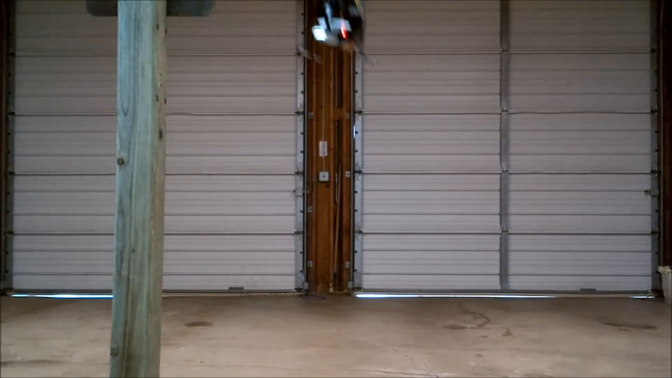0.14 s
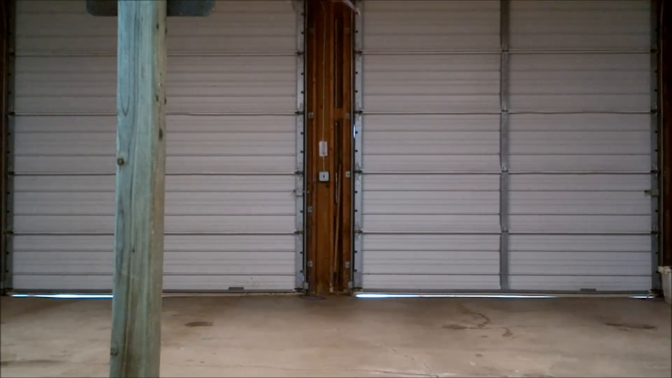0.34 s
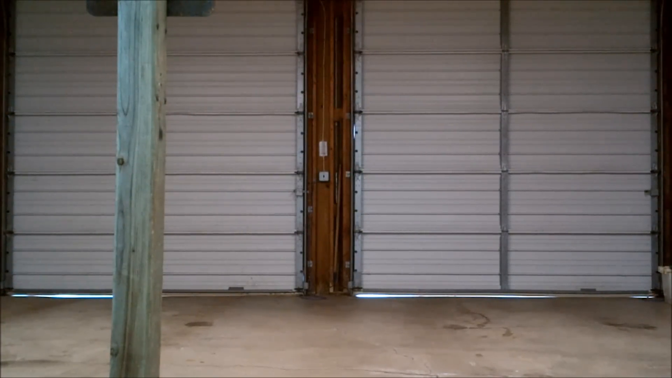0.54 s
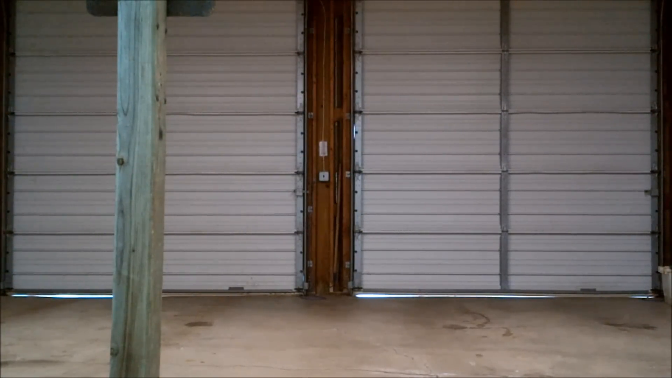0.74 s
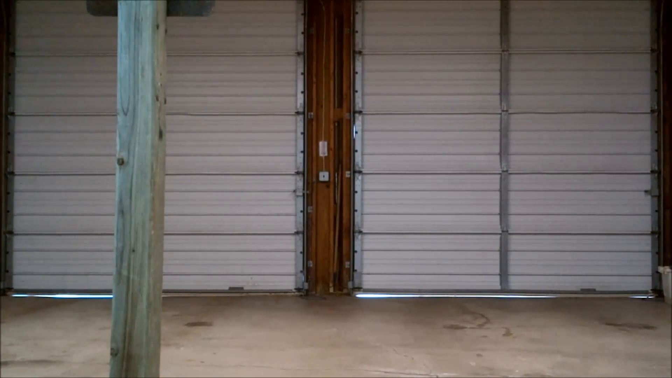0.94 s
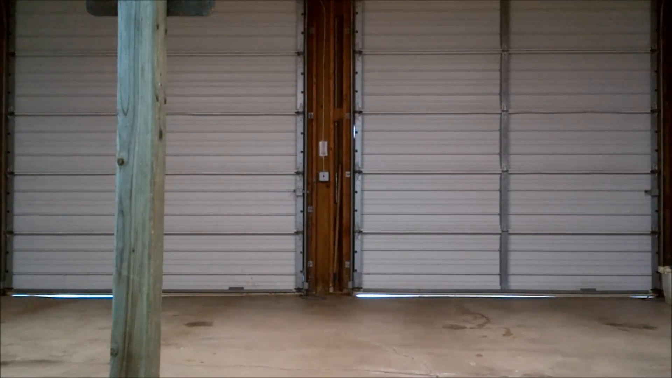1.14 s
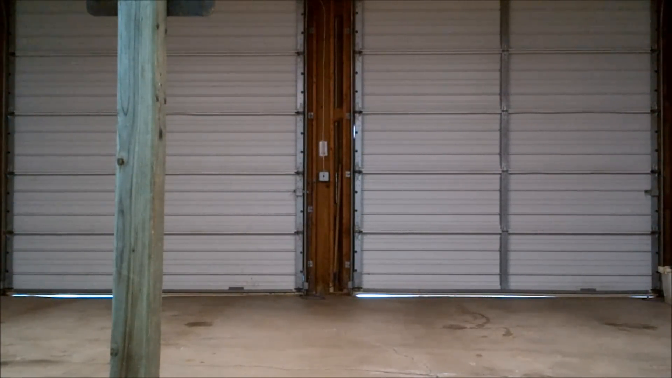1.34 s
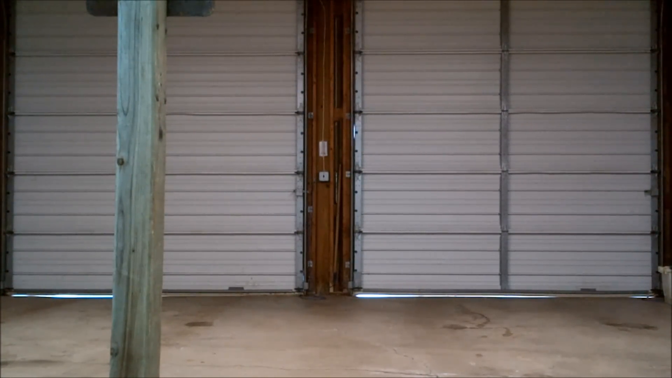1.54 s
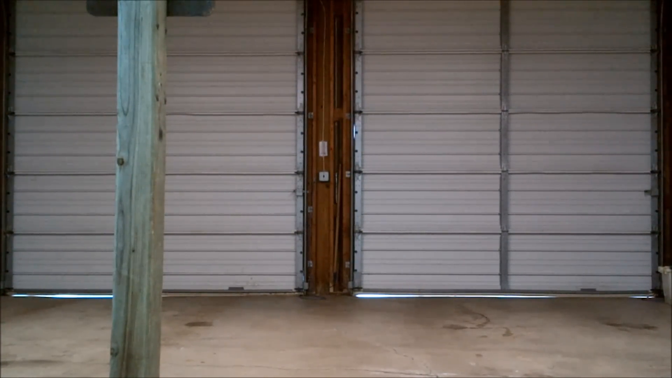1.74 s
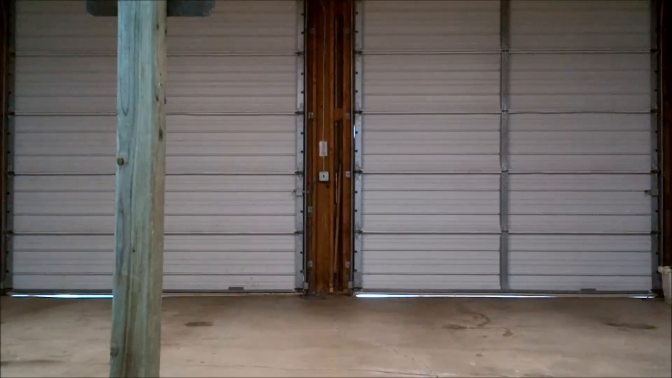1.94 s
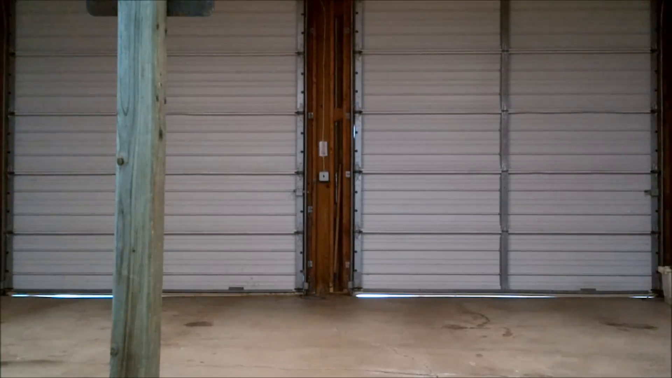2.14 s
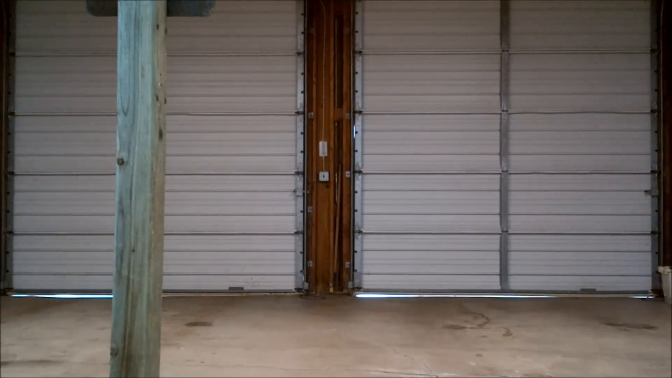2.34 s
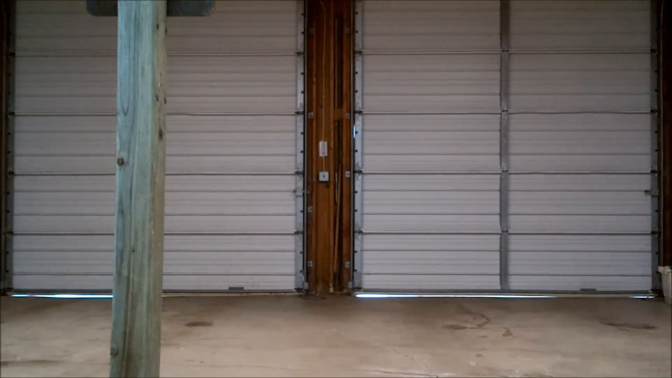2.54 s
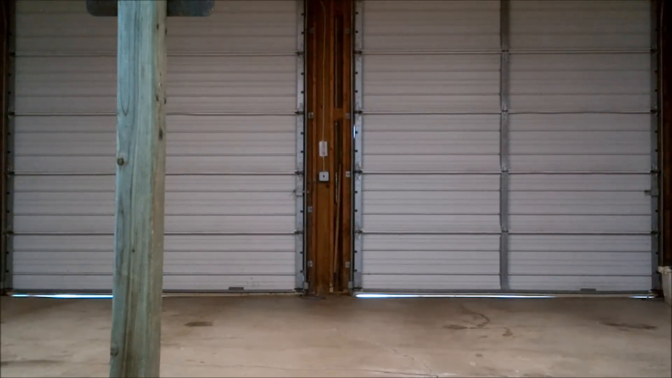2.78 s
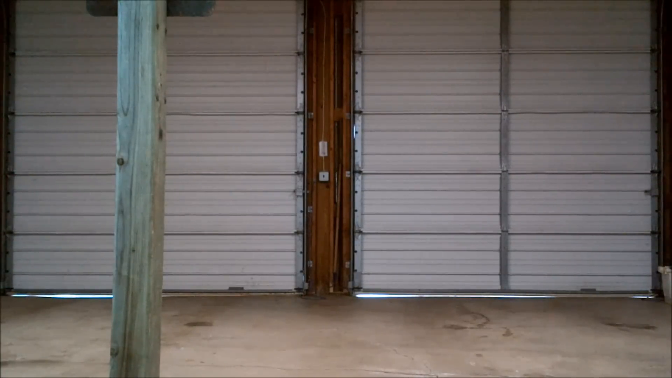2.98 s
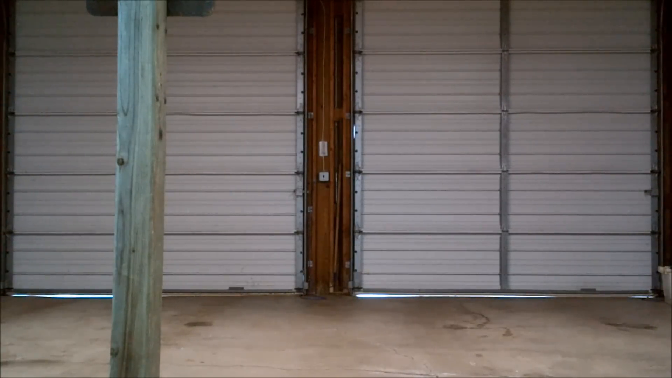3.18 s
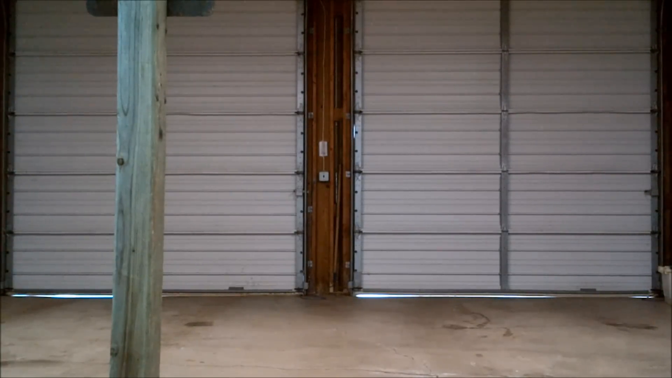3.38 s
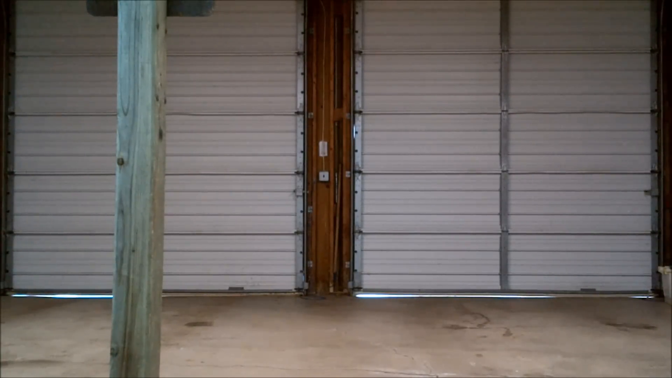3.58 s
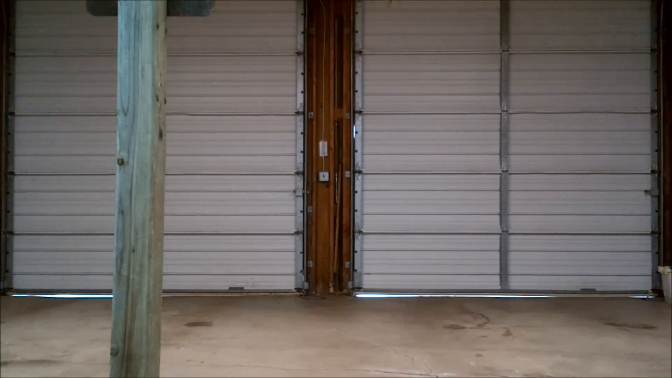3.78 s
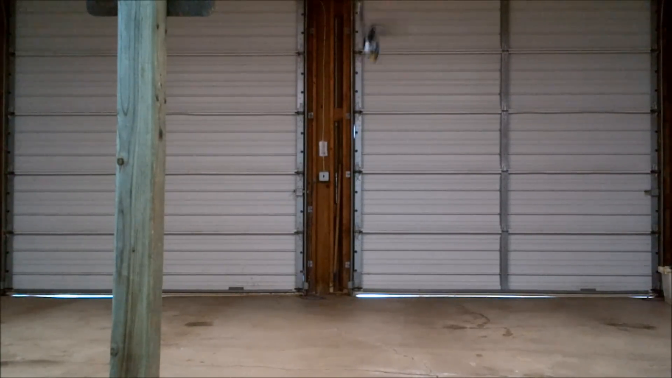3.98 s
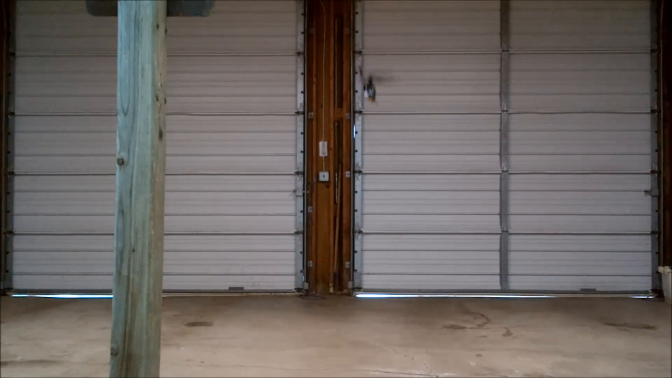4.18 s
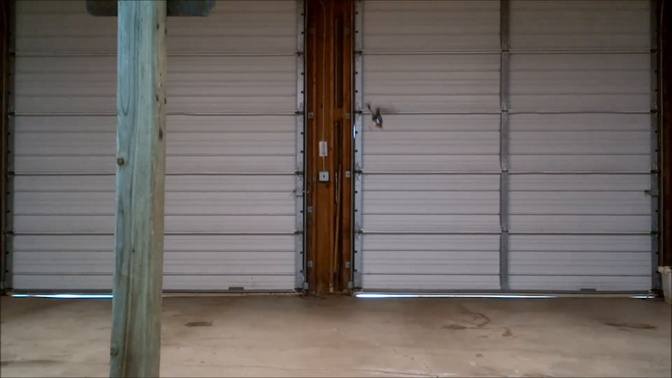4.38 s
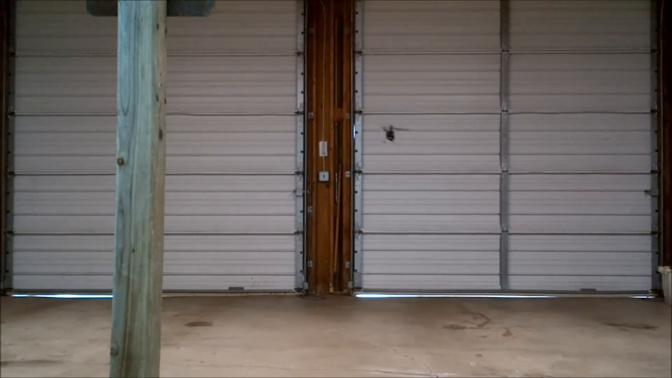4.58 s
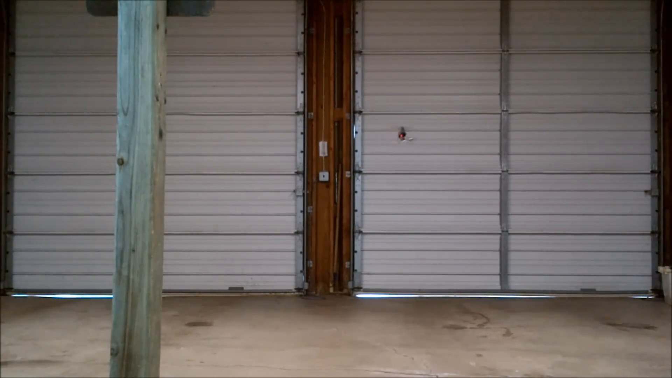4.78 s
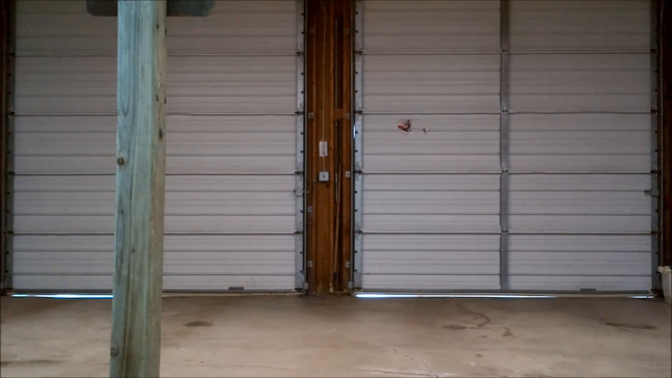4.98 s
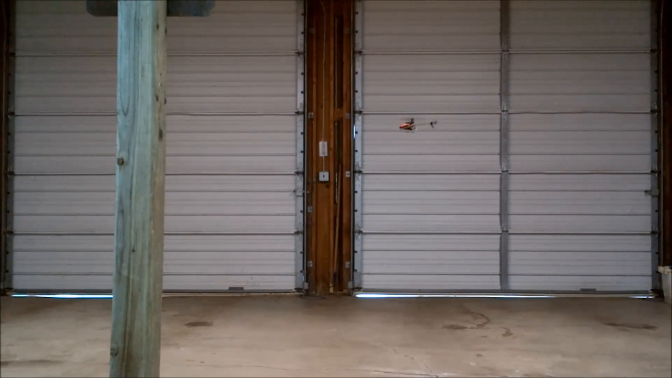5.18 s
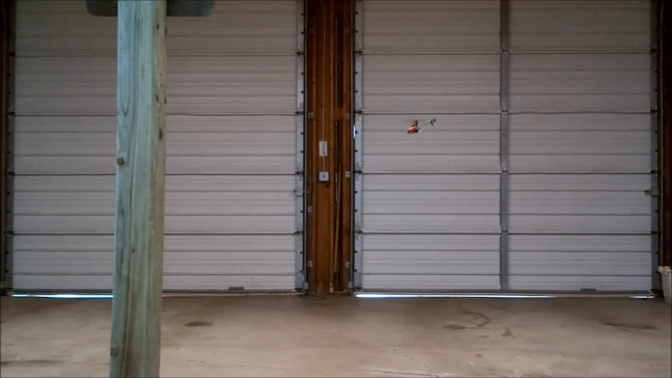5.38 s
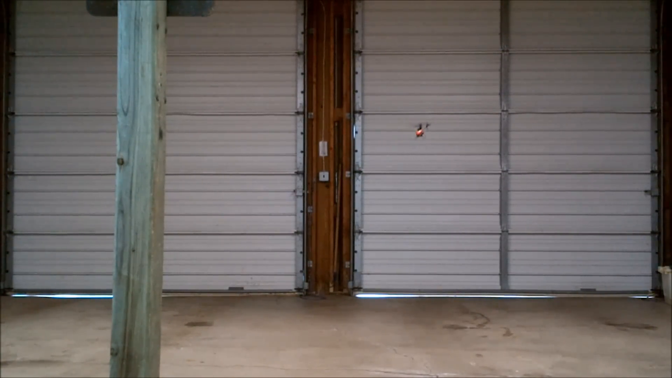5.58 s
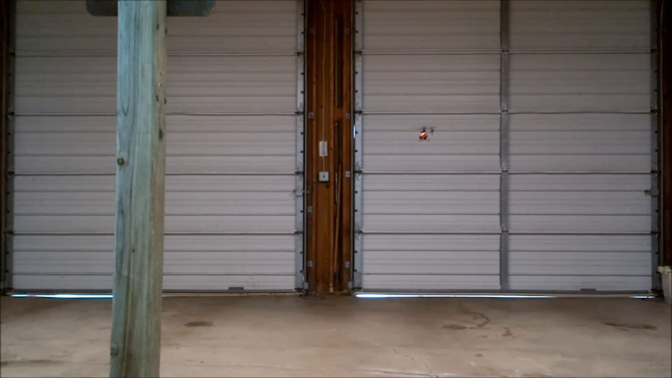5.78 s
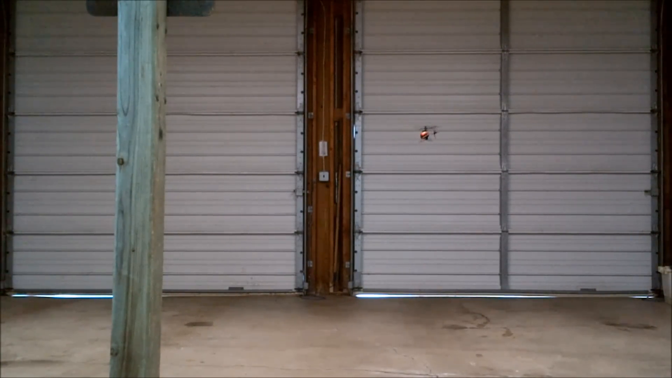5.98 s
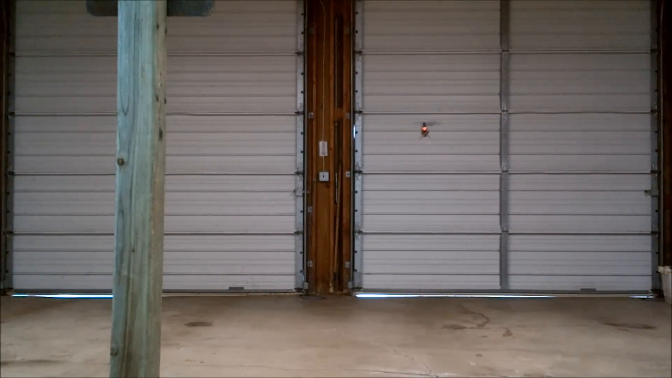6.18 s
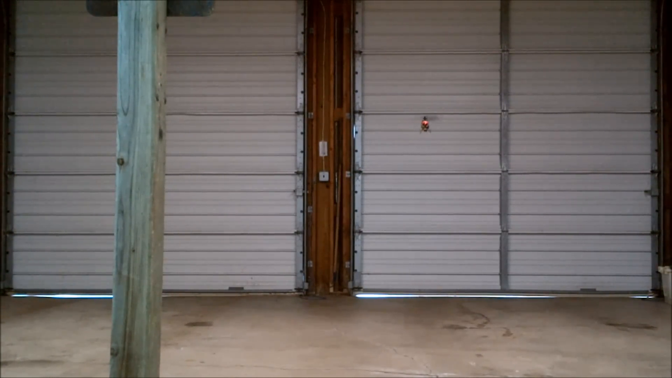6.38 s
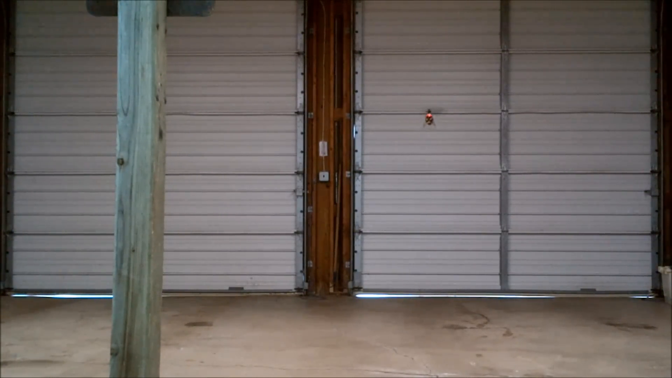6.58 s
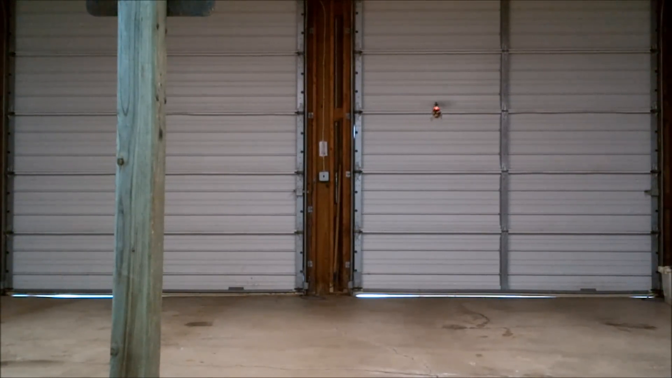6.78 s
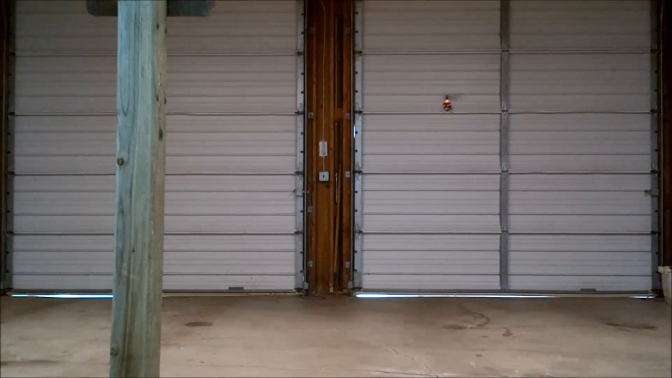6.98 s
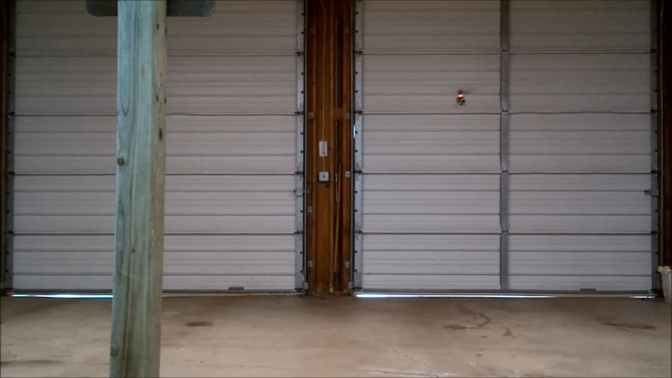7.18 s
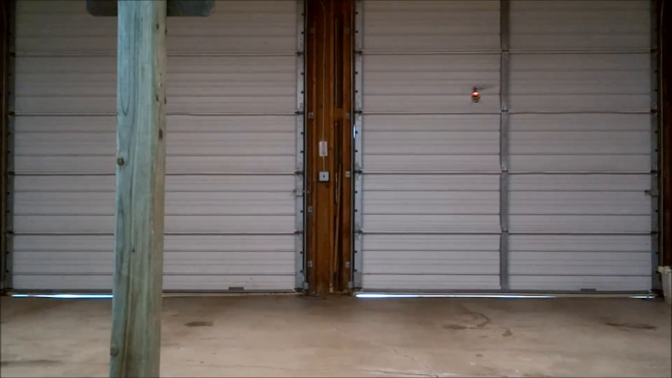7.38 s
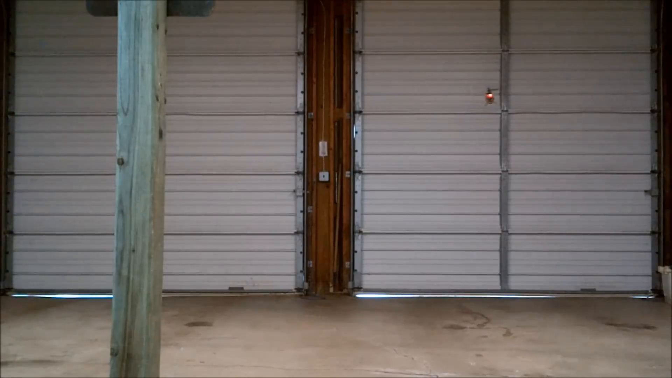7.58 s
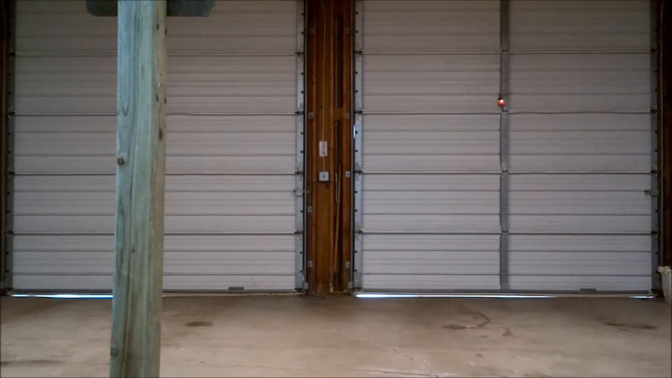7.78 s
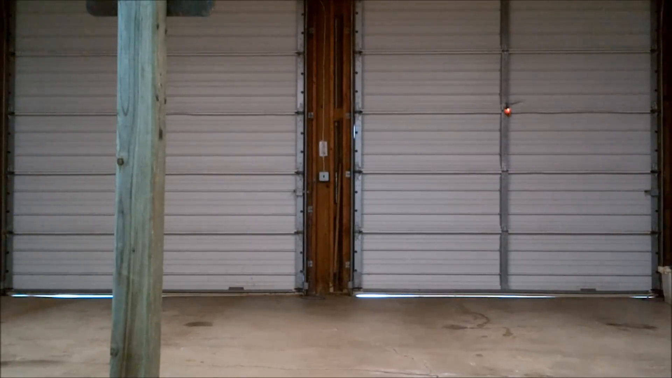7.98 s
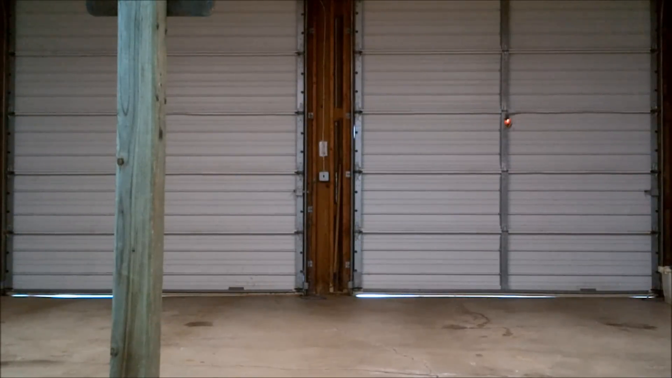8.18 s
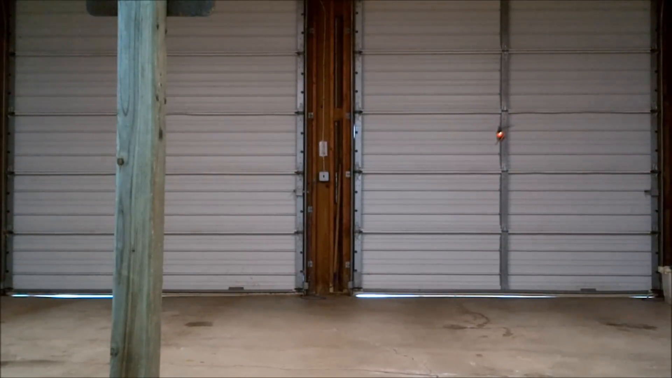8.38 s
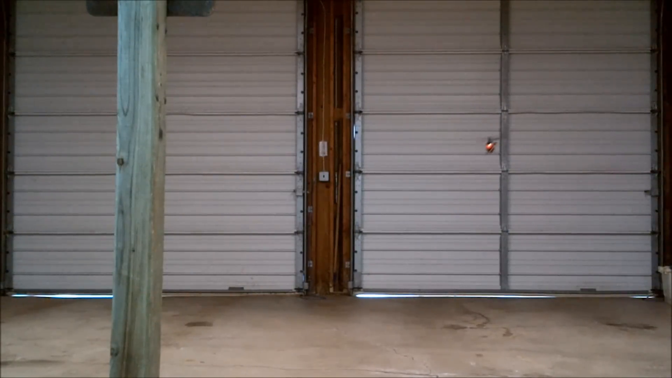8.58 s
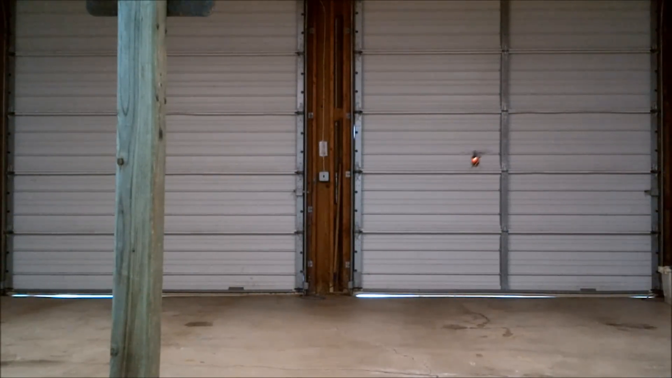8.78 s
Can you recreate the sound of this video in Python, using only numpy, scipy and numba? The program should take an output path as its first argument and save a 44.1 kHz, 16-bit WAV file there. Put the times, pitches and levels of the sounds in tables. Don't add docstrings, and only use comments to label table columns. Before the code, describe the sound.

A toy helicopter with electric motors hovers very close to a stereo microphone in a bare, hard garage, with loud buzzing gear whine and bright hiss. It passes overhead around two seconds, then flies off toward the doors, getting quieter and more echoey. It hovers far away to the end, whine wavering, with a few faint knocks over a low rumble.

```python
import sys
import numpy as np
from scipy import signal
from scipy.fft import rfft, irfft, next_fast_len
from scipy.io import wavfile
from scipy.ndimage import map_coordinates
from numba import njit

SR = 44100
rng = np.random.default_rng(int(sys.argv[2]) if len(sys.argv) > 2 else 0)


def decibels_to_gain(level_db):
    exponent = np.asarray(level_db, float) / 20
    return 10 ** exponent


def master_out(mix):
    frames = np.transpose(np.atleast_2d(mix))
    ceiling = np.clip(frames, -1, 1)
    pcm = np.round(ceiling * 32767).astype(np.int16)
    wavfile.write(sys.argv[1], SR, pcm)


N = 389403
STEP = 128

# (time [s], distance [0 near - 1 far], treble tilt [dB per octave])
DISTANCE = [(0, 0.21, 0.5), (.6, 0.079, -0.1), (.9, 0.069, -0.1), (1.23, 0.06, -.1), (1.5, 0.022, 0.0),
            (2.1, 0.054, -0.5), (2.6, 0.08, -.2), (2.9, 0.11, -0.2), (3.4, 0.29, 0.0), (3.9, 0.69, 0.5),
            (4.5, 0.91, 0.0), (5.0, 0.98, -0.5), (5.4, 1.14, 0.04), (6.1, 1.06, .1), (6.7, 1.1, 0.0),
            (7.5, 1.28, 0.6), (8.83, 1.27, 0.8)]


def in_time(rows, step=1):
    s, *columns = np.transpose(rows)
    return [np.interp(np.arange(0, N, step) / SR, s, column) for column in columns]


def at_hz(points, hz):
    point_hz, value = np.array(points).T
    return np.interp(np.log(hz), np.log(point_hz), value)


def bell(s, centre, half_width):
    return np.exp(-.5 * ((s - centre) / half_width) ** 2)


def drift(rate):
    r = np.exp(-2 * np.pi * rate * STEP / SR)
    chance = rng.standard_normal(N // STEP + 1001)
    slow = signal.lfilter([1], [1, -2 * r, r * r], chance)[999:]
    return slow[:N // STEP + 1] / slow.std()


def spread(slow):
    return np.interp(np.arange(N) / STEP, np.arange(len(slow)), slow)


def framed(x, bells):
    size = next_fast_len(N)
    hz = np.arange(size // 2 + 1) * SR / size
    shape_db = sum(db * bell(hz, centre_hz, width_hz) for centre_hz, width_hz, db in bells)
    return irfft(rfft(x, size) * decibels_to_gain(shape_db), size)[:, :N]


def rotor_turns():
    # (time [s], rotor speed [turns per s])
    flight = [(0.0, 39.5), (0.28, 38.98), (0.95, 38.95), (1.3, 39.15), (1.7, 39.73), (2.3, 39.8),
              (2.8, 39.6), (3.07, 39.29), (3.62, 39.2), (4.12, 38.72), (4.8, 39.28), (5.35, 39.83),
              (5.87, 40.07), (6.41, 39.78), (6.78, 39.92), (7.55, 38.45), (8.15, 39.05), (8.83, 39.17)]
    speed, = in_time(flight)
    return np.cumsum(np.pad(speed, (0, 2 * STEP), "edge")) / SR


@njit
def tones(turns, orders, gains, step):
    out = np.zeros((2, len(turns)))
    for k in range(len(orders)):
        for j in range((len(turns) - 1) // step):
            spin = np.exp(2j * np.pi * orders[k] * turns[j * step])
            turn = np.exp(2j * np.pi * orders[k] * (turns[(j + 1) * step] - turns[j * step]) / step)
            for i in range(step):
                for ear in range(2):
                    gain = gains[k, ear, j] + (gains[k, ear, j + 1] - gains[k, ear, j]) * i / step
                    out[ear, j * step + i] += (spin * gain).real
                spin *= turn
    return out


def geared(turns, orders, gains):
    padded = np.pad(np.array(gains), ((0, 0), (0, 0), (0, 1)), "edge")
    return np.sqrt(2) * tones(turns, np.array(orders, float), padded, STEP)[:, :N]


def echo_fading(order, echo_share, base_rate=1.5, rate_per_order=.02):
    rate = base_rate + rate_per_order * order
    echoes = np.array([drift(rate) + 1j * drift(rate) for ear in range(2)]) / np.sqrt(2)
    mix_rad = 0.17
    echoes = np.cos(mix_rad) * echoes + np.sin(mix_rad) * echoes[::-1]
    direct = np.exp(2j * np.pi * rng.random())
    return np.sqrt(1 - echo_share) * direct + np.sqrt(echo_share) * echoes


def swelling(levels, swells, far):
    s = np.arange(0, N, STEP) / SR
    return [near + (away - near) * far + sum(db * bell(s, at, half) for at, half, db in rows)
            for (near, away), rows in zip(levels, swells)]


def mesh_and_motor_tones(turns):
    # (near [dB], far [dB])
    mesh_orders = (40, 60, 36)
    mesh_db = [(-31, -37.5), (-26, -38), (-40.5, -46.5)]
    # (time [s], half length [s], level [dB])
    mesh_swells = [
        [(.36, 0.14, -29), (1.65, 0.046, 5.5), (2.3, 0.15, -11), (3.42, 0.13, -20), (3.77, 0.035, 6),
         (4.0, 0.022, 7), (5.53, 0.037, 4.5), (6.05, 0.078, -1), (6.75, 0.17, 5), (7.55, .08, -4),
         (7.89, 0.034, 4), (8.8, 0.046, 4)],
        [(.03, 0.081, -25), (.87, 0.18, -7), (1.32, 0.095, 3.5), (2.45, 0.16, -7), (2.71, 0.12, 5.5),
         (3.42, 0.12, -5.5), (3.65, 0.029, 7.5), (3.9, 0.096, -18), (4.47, .05, -11), (5.15, 0.13, 4),
         (5.8, 0.094, 6.5), (7.2, 0.1, -6), (7.53, .07, -17), (7.85, .12, -5), (8.2, 0.068, -7),
         (8.42, 0.038, 8), (8.8, 0.062, -14)],
        [(.45, 0.11, -17), (1.65, 0.051, 2), (5.3, 0.094, 8), (5.85, 0.23, 7), (6.45, 0.12, 12.5),
         (8.6, 0.96, -2)],
    ]
    # (near [dB], far [dB])
    motor_orders = (84, 72, 132, 140, 144)
    motor_db = [(-32.5, -43.5), (-39.5, -48), (-36.5, -56.5), (-38, -42.5), (-35.5, -44.5)]
    # (time [s], half length [s], level [dB])
    motor_swells = [
        [(.45, 0.16, -7.5), (1.2, .15, -8), (2.15, 0.13, -2), (2.75, 0.23, 7.5), (3.06, 0.039, -13),
         (5.9, 0.42, 6), (7.7, .3, -14)],
        [(.3, 0.27, -3), (2.0, 0.44, 5)],
        [(.9, .5, 5.5), (2.6, .3, -11)],
        [(1.9, .3, -6), (3.35, 0.21, 6)],
        [(.5, 0.22, 5), (2.4, 0.49, 3.5), (3.4, 0.29, -4)],
    ]
    far = np.clip(in_time(DISTANCE, STEP)[0], 0, 1)
    orders = [*mesh_orders, *motor_orders]
    levels = swelling([*mesh_db, *motor_db], [*mesh_swells, *motor_swells], far)
    flutter = np.clip(.17 + .28 * far, 0, 1)
    gains = [decibels_to_gain(db + 1.0) * echo_fading(k, flutter, base_rate=14.0) for k, db in zip(orders, levels)]
    return geared(turns, orders, gains)


def blade_tones(turns):
    blade_orders = [
        (2,),
        (6, 10, 14, 18),
        (8, 12, 16, 24),
    ]
    blade_db = [
        [-1],
        [-11.5, -8.5, -5.5, -33],
        [-9, -4.5, -14, -13.5],
    ]
    # (near [dB], far [dB])
    group_db = [(-45.5, -52), (-44, -60.5), (-50.5, -50.5)]
    # (time [s], half length [s], level [dB])
    blade_swells = [
        [(.4, .2, 2), (3.84, 0.25, 8.5), (5.8, 0.23, -7), (6.53, .15, 1)],
        [(1.75, 0.52, 6), (3.1, 0.36, -25), (4.85, .15, 10), (8.45, .12, 12)],
        [(.1, .4, -4), (1.9, 0.71, 11.5), (3.6, 0.5, 6.5), (6.14, 0.11, -7), (6.53, .12, 3.5)],
    ]
    far = np.clip(in_time(DISTANCE, STEP)[0], 0, 1)
    echo_share = np.clip(.2 + .1 * far, 0, 1)
    orders, gains = [], []
    for group, shares, db in zip(blade_orders, blade_db, swelling(group_db, blade_swells, far)):
        orders += group
        gains += [decibels_to_gain(db + share) * echo_fading(k, echo_share, base_rate=2.5)
                  for k, share in zip(group, shares)]
    return geared(turns, orders, gains)


def gear_tones(turns):
    # (near [dB], far [dB])
    gear_orders = (32, 44, 48, 52, 56, 64, 68, 76, 88, 96, 100)
    gear_db = [(-61, -54), (-43, -54), (-35, -46.5), (-35.5, -63), (-38, -56.5), (-57, -51), (-38, -49),
               (-40.5, -56), (-43, -43), (-39, -55), (-58, -59)]
    # (near [dB], far [dB])
    whine_orders = (112, 116, 120, 148, 152, 156, 168, 180, 200, 204, 208, 216, 228, 236, 248, 252)
    whine_db = [(-41, -58), (-37, -60), (-37, -48), (-34, -51), (-36, -52), (-36, -51), (-33, -45),
                (-36, -53), (-36, -47), (-35, -52), (-36, -54), (-34, -54), (-32, -52), (-34, -53),
                (-35, -57), (-36, -60)]
    # (near [dB], far [dB])
    wobble_orders = (37, 39, 41, 55, 59, 61, 62, 63, 65, 85, 119, 167)
    wobble_db = [(-47, -44.5), (-41, -49.5), (-41.5, -46.5), (-35.5, -77), (-33.5, -67), (-32.5, -46),
                 (-48, -77), (-32, -78), (-64, -74), (-51, -53), (-54, -64), (-36.5, -75)]
    # (near [dB], far [dB])
    between_orders = (7.75, 15.5)
    between_db = [(-47, -57), (-47, -57.5)]
    taken = [*whine_orders, 132, 140, 144]
    comb_orders = [k for k in range(104, 268, 4) if k not in taken]
    comb_db = [(-39.5, -52)] * len(comb_orders)   # (near [dB], far [dB])
    far = np.clip(in_time(DISTANCE, STEP)[0], 0, 1)
    wet = np.clip(0.5 + 0.48 * far, 0, 1)
    orders = [*gear_orders, *whine_orders, *wobble_orders, *between_orders, *comb_orders]
    levels = [*gear_db, *whine_db, *wobble_db, *between_db, *comb_db]
    gains = [decibels_to_gain(near + (away - near) * far) * echo_fading(k, wet)
             for k, (near, away) in zip(orders, levels)]
    return geared(turns, orders, gains)


def banded_noise(spectrum, edges, level_db, patchy_db):
    # (frequency [Hz], likeness [-1 to 1])
    like_near = [(60, 0.66), (290, 0.88), (640, 0.72), (1400, 0.087), (3100, 0.29), (6800, 0.33),
                 (15000, 0.4)]
    like_far = [(60, 0.51), (290, 0.67), (640, 0.21), (1400, 0.14), (3100, 0.096), (6800, 0.14),
                (15000, 0.045)]
    out, far = 0, in_time(DISTANCE, STEP)[0]
    white = rng.standard_normal((2, 2, N))
    for k, (low, high) in enumerate(zip(edges, edges[1:])):
        band = signal.butter(2, [low, high], "band", fs=SR, output="sos")
        mid, side = signal.sosfilt(band, white[k % 2])
        hz = np.sqrt(low * high)
        alike = np.clip(at_hz(like_near, hz) * (1 - far) + at_hz(like_far, hz) * far, -.9, .95)
        gain = decibels_to_gain(at_hz(spectrum, hz) + level_db(hz) + patchy_db * drift(3.4))
        out = out + spread(gain * np.sqrt(1 + alike)) * mid
        out = out + spread(gain * np.sqrt(1 - alike)) * side * [[1], [-1]]
    return out


def hiss(turns):
    # (frequency [Hz], level [dB per Hz])
    body = [(150, -23), (300, -20.5), (600, -19.5), (800, -19), (1200, -19.5), (1500, -6), (2350, -10),
            (3000, -7), (4200, -6), (5600, -5), (7200, -4), (8800, -2.5), (10500, -4), (12500, -12),
            (14300, -20)]
    # (frequency [Hz], level [dB])
    far_loss = [(600, -4.5), (2800, -6.5), (5500, -10), (10500, -12)]
    away, tilt_db = in_time(DISTANCE, STEP)

    def level_db(hz):
        return at_hz(far_loss, hz) * away + tilt_db * np.log2(hz / 2000)

    noise = banded_noise(body, np.geomspace(140, 16500, 34), level_db, patchy_db=1.0)
    angle, far = 2 * np.pi * turns, in_time(DISTANCE)[0]
    beat = 0.1 * np.cos(angle) + 0.058 * np.cos(2 * angle)
    beat += 0.11 * np.cos(4 * angle) + 0.072 * np.cos(8 * angle)
    beat += 0.069 * np.cos(12 * angle)
    return (decibels_to_gain(-10.0) * noise + canopy_lobe()) * (1 + beat * np.clip(1 - 0.43 * far, 0, 1))


def canopy_lobe(width_hz=450):
    # (time [s], centre [Hz], level [dB])
    sweep = [(0, 9200, -23), (.12, 9600, -23), (.25, 9000, -20.5), (.4, 8400, -21.5), (.65, 8700, -27),
             (.95, 9246, -22), (1.2, 8940, -23), (1.35, 9000, -23), (1.65, 8990, -24.5), (2.1, 8520, -26.5),
             (2.7, 8730, -25), (2.95, 8060, -27), (3.2, 8240, -29), (3.55, 8260, -31), (4.2, 8450, -36),
             (5.1, 8300, -45), (8.83, 8340, -50)]
    centre_hz, db = in_time(sweep)
    low = signal.butter(2, width_hz, fs=SR, output="sos")
    real, imag = signal.sosfilt(low, rng.standard_normal((2, 2, N)))
    carrier = np.exp(2j * np.pi * np.cumsum(centre_hz) / SR)
    mid, side = ((real + 1j * imag) * carrier).real
    return decibels_to_gain(db) * (1.1 * mid + 0.36 * side * [[1], [-1]]) / mid.std()


def airframe(noise):
    # (centre [Hz], width [Hz], level [dB])
    humps = [(5700, 110, 3.5), (8160, 126, 1), (7840, 190, 1), (10200, 360, -3.5), (15300, 520, 8.5)]
    # (centre [Hz], width [Hz], level [dB])
    dips = [(195, 30, -10), (265, 20, -8), (355, 20, -6), (780, 60, -4), (1330, 45, -7), (1800, 50, -6),
            (2750, 65, -13), (2950, 40, -8), (3140, 85, -16), (3690, 50, -5), (4010, 70, -6),
            (4350, 130, -6)]
    # (centre [Hz], width [Hz], level [dB])
    valleys = [(210, 60, -10), (360, 30, -8), (800, 60, -5), (2750, 70, -8), (3120, 110, -10), (3700, 80, -8),
               (4250, 200, -10), (4950, 120, -6)]
    filled = np.clip(.04 + .28 * in_time(DISTANCE)[0], 0, 1)
    noise = framed(noise, humps)
    noise = framed(noise, dips) * (1 - filled) + noise * filled
    above = bell(np.arange(N) / SR, 2.3, .35)
    return framed(noise, valleys) * above + noise * (1 - above)


def switching_whistle():
    far = in_time(DISTANCE)[0]
    return decibels_to_gain(-47 - 10 * far) * np.sin(2 * np.pi * 14154 * np.arange(N) / SR)


def brief_notches(sound):
    moments = (1.82, 2.03, 2.36)
    # (centre [Hz], width [Hz], level [dB])
    notches = [(4300, 200, -22), (3150, 100, -8)]
    s = np.arange(N) / SR
    notched = np.clip(sum(bell(s, at, .05) for at in moments), 0, 1)
    return framed(sound, notches) * notched + sound * (1 - notched)


def placed(sound):
    # (time [s], left-right [dB], left lag [samples])
    place = [(0, -0.3, -0.5), (.9, -0.3, -0.5), (1.4, -1.5, 3), (2.1, -1.7, 6), (2.7, -1, 5),
             (3.1, -1.5, 3), (3.8, -0.5, 0.5), (5, -1.5, 1.5), (6.5, -1, 1.5), (8.83, -1, 3)]
    pan_db, lag = in_time(place)
    left, right = sound
    left = map_coordinates(left, [np.arange(N) - lag], order=3, mode="nearest")
    return np.array([left * decibels_to_gain(pan_db / 2), right * decibels_to_gain(-pan_db / 2)])


def knocks():
    # (time [s], peak [dB], pitch [Hz], decay by 60 dB [s])
    rings = [
        (4.57, -40, 580, .25),
        (4.66, -40, 505, .2),
        (4.8, -39, 555, .35),
        (6.176, -31, 338, 0.11),
        (6.205, -40, 753, 0.36),
    ]
    out = np.zeros(N)
    for s, db, hz, t60 in rings:
        age = np.maximum(np.arange(N) / SR - s, 0)
        soft_onset = 1 - np.exp(-age / 0.0076)
        out += decibels_to_gain(db - 60 * age / t60) * soft_onset * np.sin(2 * np.pi * hz * age)
    return out


def rumble():
    # (frequency [Hz], level [dB per Hz])
    drone = [(8.8, -30), (15, 1), (64, -3.5), (101, -5.5), (124, -4.5), (162, -13), (276, -18.5),
             (308, -19.5), (400, -18), (520, -45), (880, -120)]
    noise = banded_noise(drone, np.geomspace(14, 400, 10), lambda hz: 0, patchy_db=.8)
    return decibels_to_gain(-40.5) * noise / noise.std() * decibels_to_gain([[-.6], [.6]])


def microphone_hiss():
    return decibels_to_gain(-61) * np.diff(rng.standard_normal((2, N + 1)))


def scene():
    turns = rotor_turns()
    craft = mesh_and_motor_tones(turns) + blade_tones(turns) + gear_tones(turns)
    craft = craft + airframe(hiss(turns[:N])) + switching_whistle()
    return placed(brief_notches(craft)) + knocks() + rumble() + microphone_hiss()


def roll_off(x):
    return signal.sosfilt(signal.butter(12, 16920, fs=SR, output="sos"), x)


def record(dry):
    # (frequency [Hz], left-right [dB])
    port_balance = [(60, -1.5), (180, -1), (550, 1.5), (1650, -2.5), (4970, -2.5), (15000, 0.5)]
    size = next_fast_len(N)
    hz = np.arange(size // 2 + 1) * SR / size
    balance_db = at_hz(port_balance, hz + 1) + 0.97
    response = (hz < 15740) * decibels_to_gain(balance_db / 2 * [[1], [-1]])
    rounded = 1.1 * np.tanh(dry / 1.1)
    mix = irfft(rfft(rounded, size) * response, size)[:, :N]
    return roll_off(mix)


dry = scene()
out = record(dry)
master_out(out)
```